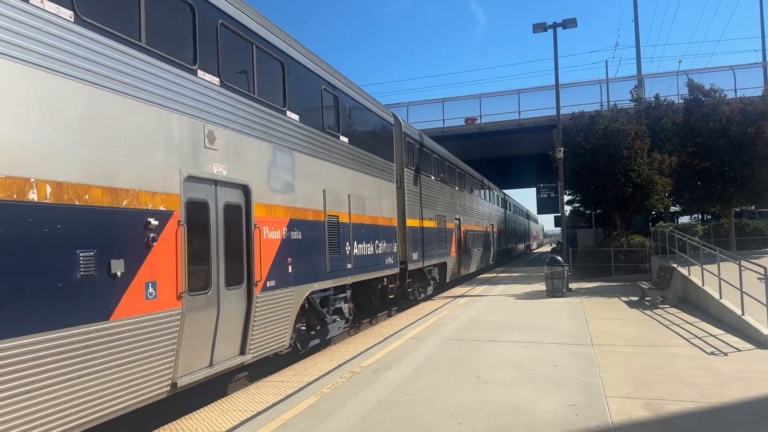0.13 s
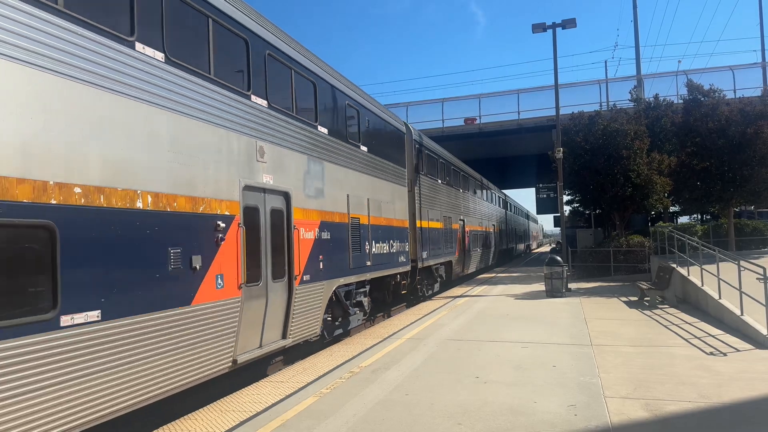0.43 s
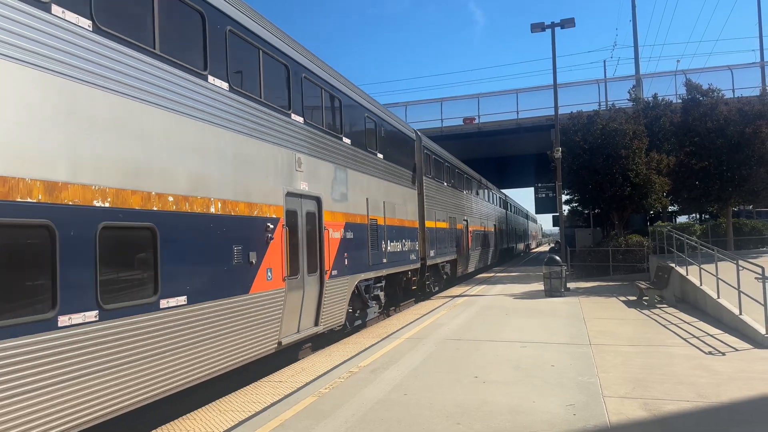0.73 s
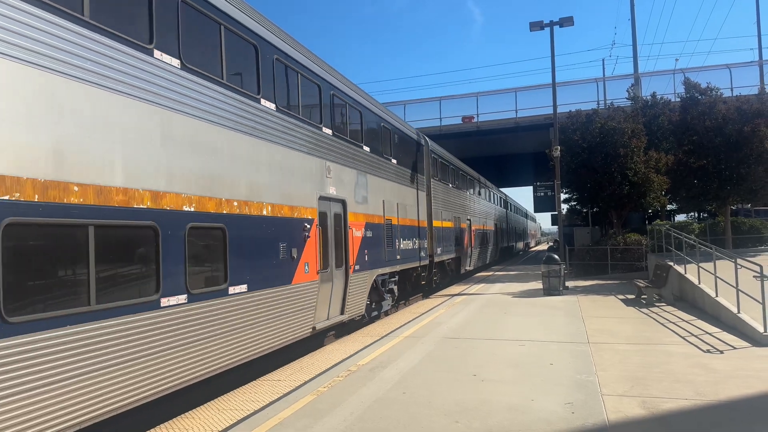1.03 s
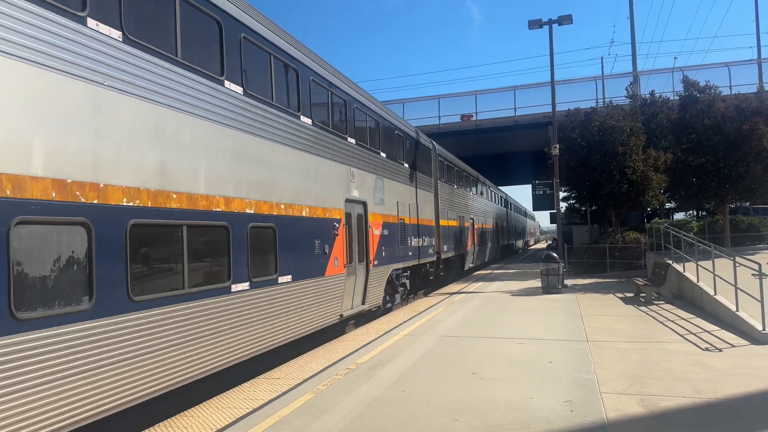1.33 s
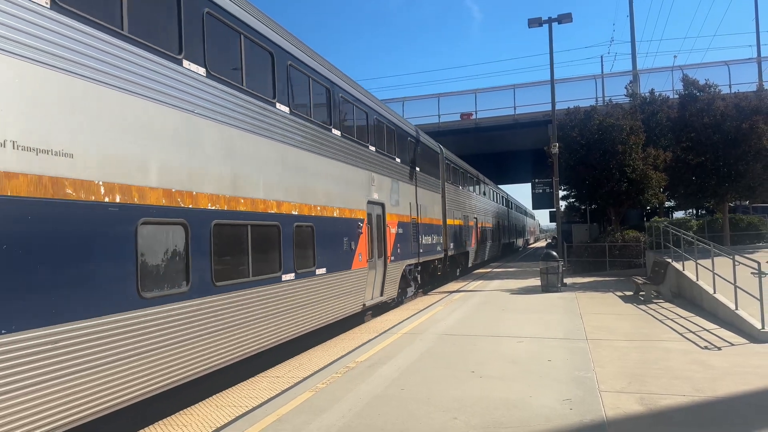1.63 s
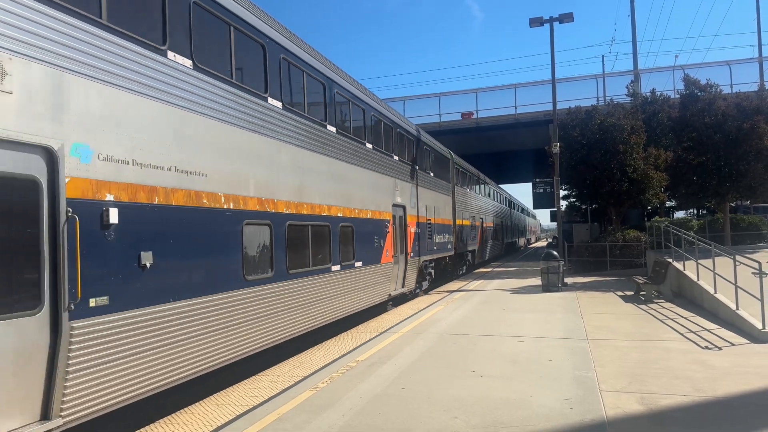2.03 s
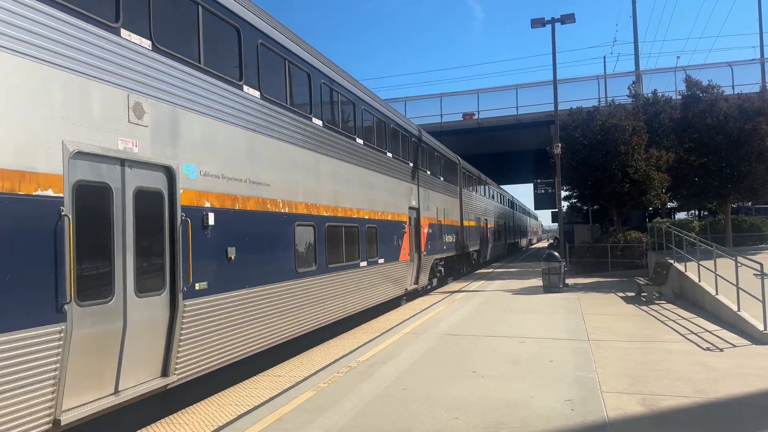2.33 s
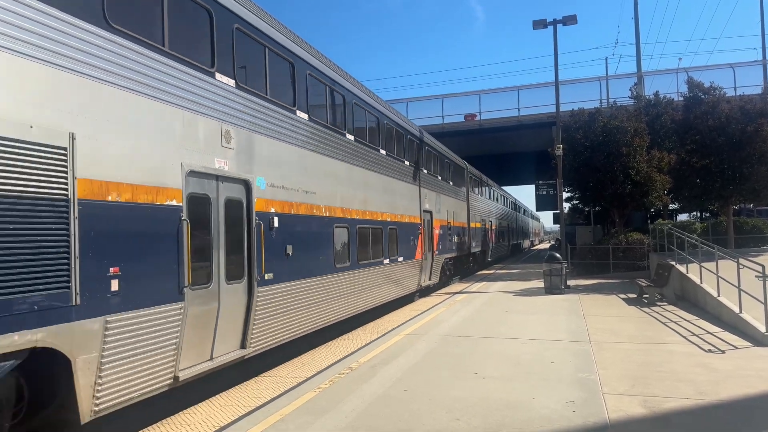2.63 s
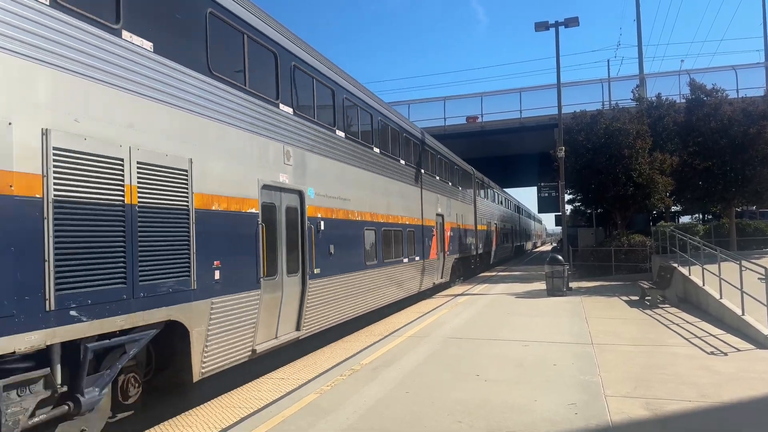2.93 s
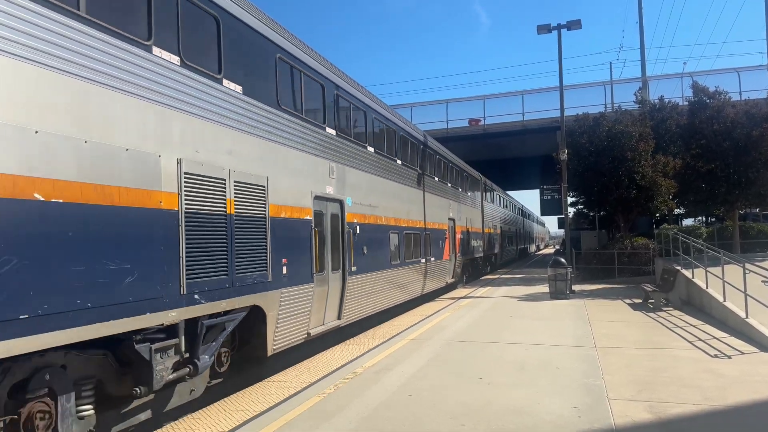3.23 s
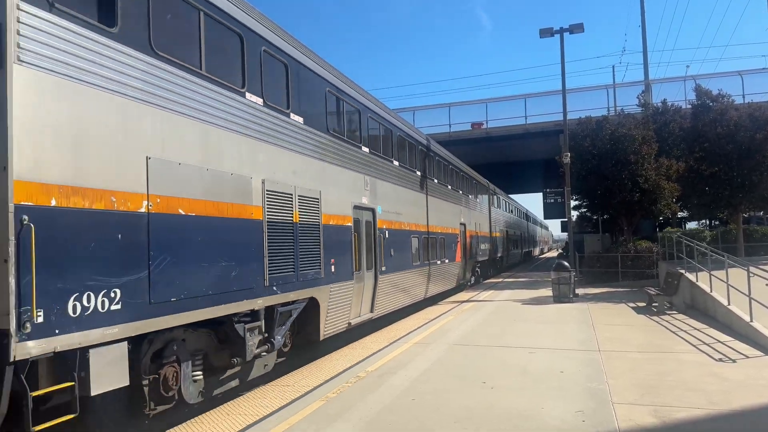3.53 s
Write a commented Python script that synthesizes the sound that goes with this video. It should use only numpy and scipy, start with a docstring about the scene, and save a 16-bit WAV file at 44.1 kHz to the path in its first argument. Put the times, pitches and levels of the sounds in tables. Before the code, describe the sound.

Passenger train cars roll past close by with deep rumble, low hum, wheel knocks and late air hiss

```python
"""A station platform: passenger cars roll past, close on the left of the stereo image.
Wheels and rails rumble and sizzle as coloured noise, one set of wheels after another; an underfloor machine
hums at mains pitch as wavering sines, passes and drops in pitch. Wheels sing in narrow noise and near-pure tones,
knock on uneven rail as decaying low sines, and a few loose parts tick as puffs of noise.
Near the end compressed air starts to hiss: bright noise with faint whistles."""
import sys
import numpy as np
from scipy import signal
from scipy.fft import rfft, irfft, next_fast_len
from scipy.io import wavfile

SR = 44100
rng = np.random.default_rng(int(sys.argv[2]) if len(sys.argv) > 2 else 0)


def rack_gain(trim_db):
    """Turn a fader trim in dB into the linear factor to multiply a signal by."""
    fader = np.asarray(trim_db, float)
    return 10 ** (fader / 20)


def master(y):
    """Save y as 16-bit WAV."""
    cut = np.clip(np.atleast_2d(y).T, -1, 1)
    pcm = np.round(cut * 32767)  # scale
    wavfile.write(sys.argv[1], SR, pcm.astype(np.int16))


N = 163170

# Loose parts tick: start_s, level_db at the onset, pitch_hz
TICKS = [(1.28, -45, 5000), (1.38, -38, 3246), (1.447, -40, 4900), (3.285, -38, 3650), (3.571, -42, 4500)]
# Tone colour of the air jet: frequency_hz, density_db (per Hz, relative)
AIR_COLOUR = [(9000, -24), (10500, -19), (11500, -11), (12300, -5), (13000, -3), (13500, 0), (14300, -1),
              (14700, -3), (15400, 0), (16000, 0)]
# Faint whistles in the air jet: pitch_hz, level_db
AIR_WHISTLES = [(12722, -53), (13405, -57), (13549, -56), (13808, -57), (14255, -54), (14365, -57),
                (15001, -56), (15423, -55), (15640, -55)]
# Single wheel modes that ring almost clean: middle_s, spread_s, pitch_hz, level_db at the middle
RINGING = [(.04, .08, 2708, -52), (.28, .05, 1540, -47), (.65, .12, 3350, -54), (1.05, .025, 3390, -48),
           (1.35, .08, 7370, -57), (2.19, .04, 3420, -48), (2.53, .15, 3420, -46.5), (2.93, .08, 3410, -56)]
# Wheels and panels ring in noisy bands: middle_s, spread_s, pitch_hz, width_hz, level_db at the middle
SINGING = [(1.56, 0.99, 3340, 520, -43), (2.24, 0.24, 3420, 400, -41), (2.64, 0.24, 3430, 400, -39),
           (1.35, 0.4, 7300, 1900, -48.5), (1.44, 0.047, 6900, 610, -50), (0.64, 0.2, 1400, 230, -38.5),
           (1.92, 0.065, 2270, 390, -42), (0.96, 0.34, 5160, 600, -55), (2.02, 0.043, 5500, 600, -43),
           (1.91, .04, 5750, 600, -47), (.3, .3, 4230, 900, -58.5), (2.59, .08, 3320, 200, -46.5),
           (2.67, 0.29, 740, 470, -31.5), (0.86, 0.48, 404, 250, -35), (1.58, 0.19, 2400, 1200, -41),
           (2.32, 0.13, 1570, 2000, -31), (0.12, 0.29, 1770, 580, -41.5), (2.14, 0.26, 12100, 2600, -45.5),
           (3.53, 0.095, 104, 35, -28), (1.1, 0.17, 332, 61, -33), (2.22, 0.26, 523, 140, -30.5),
           (2.05, 0.14, 240, 150, -33), (1.02, 0.3, 149, 51, -32), (.2, 0.43, 5500, 700, -58),
           (0.23, 0.24, 670, 270, -42), (0.33, 0.39, 374, 68, -37), (2.6, 0.25, 554, 230, -39.5),
           (0.98, 0.24, 9000, 1100, -55.5)]
# Wheels knock over uneven rail: start_s, peak_db, pitch_hz
THUMPS = [(1.65, -31, 144), (1.77, -31, 207), (1.931, -19.5, 227), (2.027, -16.5, 197), (2.131, -16, 171),
          (2.41, -22, 236), (2.561, -21, 336), (2.991, -20, 201), (2.069, -22.5, 298), (2.18, -22, 538),
          (.3, -26.5, 110), (0.681, -20, 182), (2.251, -22.5, 284.5), (2.701, -19, 242), (3.099, -19, 181)]
# Machine hum: time_s, pitch_hz, level_db
HUM = [(0, 59, -23.5), (.15, 60.9, -29), (.35, 59.1, -21), (.55, 59.7, -23.5), (.7, 58.3, -28),
       (.82, 58.6, -23), (1.1, 59.9, -21), (1.35, 60.02, -17), (1.6, 59.6, -19.5), (1.75, 59.76, -20.5),
       (1.95, 58.74, -20), (2.2, 58.7, -20.5), (2.4, 58.68, -19.5), (2.9, 59, -23), (3.17, 58.78, -26.5),
       (3.4, 59.06, -26), (3.7, 56.9, -31)]
# Overtones of the hum: multiple of its pitch, level_db at the middle, middle_s, spread_s
HUM_OVERTONES = [(3.0, -29.5, 2.38, 0.63), (4.0, -32.5, 2.22, 0.84), (5.0, -29, 2.19, 0.28),
                 (6.0, -27.5, 2.633, 0.18), (3.6, -28, 1.7, 0.038)]
# A second low tone that wavers and fades away: time_s, pitch_hz, level_db
DRONE = [(0, 96, -29), (.12, 98, -25.5), (.24, 97, -35), (.4, 97, -29), (.55, 97, -29), (.65, 97, -33),
         (.85, 97.5, -27.5), (.97, 96.5, -40), (1.3, 96, -36), (1.6, 95.5, -42)]
# Bright hiss of the rail contact: time_s, level_db
SIZZLE = [(0, -59.5), (.4, -55.5), (.8, -52.5), (1.3, -50), (1.6, -45.5), (2.0, -46), (2.4, -43.5),
          (2.6, -43.5), (2.9, -45.5), (3.2, -47.5), (3.35, -52), (3.7, -73)]
# Tone colour of that hiss: frequency_hz, density_db (per Hz, relative)
SIZZLE_COLOUR = [(4000, -7.5), (7000, 0), (8500, 2), (9800, -4.5), (11000, -0.5), (12500, -4.5),
                 (14000, -5.5), (15800, -5.5)]
# Rumble of all the wheels along the train: time_s, level_db
ROLLING = [(0, -25), (.5, -24.5), (1.0, -23), (1.5, -22.5), (2.0, -21), (2.6, -23.5), (3.2, -24.5),
           (3.7, -27.5)]
# Tone colour of that rumble: frequency_hz, density_db (per Hz, relative)
ROLLING_COLOUR = [(25, -39), (38, -28), (48, -34), (62, -10.5), (100, -8.5), (135, -10.5), (170, -7.5),
                  (210, -12), (360, -15.5), (550, -20.5), (900, -22.5), (1450, -25.5), (1800, -33.5),
                  (2700, -36), (3400, -41), (4600, -51), (5300, -46), (8500, -55.5), (11000, -70)]
# The next car's wheels: time_s, level_db
NEXT_BOGIE = [(1.6, -47), (2.1, -32), (2.4, -23), (2.7, -25.5), (3.0, -23), (3.15, -25), (3.3, -24.5),
              (3.5, -26), (3.7, -24.5)]
# Tone colour of the next car's wheels: frequency_hz, density_db (per Hz, relative)
NEXT_COLOUR = [(41, -36), (70, -12), (81, -1.5), (141, -9), (176, -3), (297, -8), (410, -6), (481, -12.5),
               (897, -18.5), (1740, -26.5), (1960, -24.5), (3050, -33.5), (3660, -30), (5580, -41),
               (8500, -46.5), (11000, -85), (18700, -120)]
# The nearest wheels and machinery pass: time_s, level_db
NEAR_BOGIE = [(0, -36), (.9, -31.5), (1.4, -27), (1.75, -23.5), (2.05, -22), (2.3, -26.5), (2.55, -24),
              (2.8, -27.5), (3.2, -35.5), (3.7, -40.5)]
# Tone colour of the nearest wheels and machinery: frequency_hz, density_db (per Hz, relative)
BOGIE_COLOUR = [(41, -59), (70, 3.5), (87, -17), (166, -12), (224, -6), (303, -9.5), (394, -10), (532, -9),
                (705, -22), (795, -16), (1240, -21.5), (1890, -19), (3440, -32.5), (4940, -42),
                (8500, -49.5), (11000, -75), (18700, -120)]
# How alike left and right are: frequency_hz, likeness (0 to 1)
LIKENESS = [(60, 0.88), (250, 0.98), (600, 0.46), (1000, 0.87), (1400, 0.19), (2000, 0.63), (2800, 0.72),
            (3600, 0.12), (4500, 0.82), (6000, 0.083), (8000, 0.36)]
# How much the noise leans to the left: frequency_hz, left_minus_right_db
LEFT_BIAS = [(60, 0.3), (380, 0.2), (800, 5.5), (1400, 2), (2500, 0.5), (3500, 0), (5500, 4), (7500, 2),
             (8500, 1.5)]

SIZE = next_fast_len(N + 4096)  # FFT length in samples, with room after the end
TIME_S = np.arange(N) / SR
BOGIE_LEAD_S = 0.000412  # the left hears the near wheels first by this much


def in_time(rows):
    """Table columns joined by straight lines, one value a sample."""
    s, *columns = np.transpose(rows)
    return [np.interp(TIME_S, s, column) for column in columns]


def at_hz(points, hz):
    """A table read on a log-frequency axis."""
    table_hz, values = np.array(points).T
    return np.interp(np.log(hz), np.log(table_hz), values)


def rms_one(x):
    """Scaled to rms 1."""
    return x / np.sqrt(np.mean(x ** 2) + 1e-20)


def drift(rate_hz):
    """Slow random wander of spread 1: noise through two equal one-pole lowpasses at rate_hz."""
    hop = 40  # samples between wander points
    pole = np.exp(-2 * np.pi * rate_hz * hop / SR)
    noise = rng.standard_normal(N // hop + 2002)
    slow = signal.lfilter([1], [1, -2 * pole, pole * pole], noise)[2000:]  # skip the filter's run-in
    return np.interp(np.arange(N) / hop, np.arange(len(slow)), rms_one(slow))


def bell(middle_s, spread_s):
    """A smooth Gaussian swell and fade."""
    return np.exp(-.5 * ((TIME_S - middle_s) / spread_s) ** 2)


def stereo_white(lead_s, extra_likeness=0):
    """Spectra of left and right noise, partly alike, the left ahead and biased."""
    hz = np.maximum(np.arange(SIZE // 2 + 1) * SR / SIZE, 1)
    common, other = rfft(rng.standard_normal((2, SIZE)))
    alike = np.clip(at_hz(LIKENESS, hz) + extra_likeness, 0, .99)
    bias = rack_gain(at_hz(LEFT_BIAS, hz) / 2)
    delayed = common * np.exp(-2j * np.pi * hz * lead_s)
    right = alike * delayed + np.sqrt(1 - alike ** 2) * other
    return hz, np.array([common * bias, right / bias])


def coloured_noise(colour, lead_s, patchy_db, treble_patchy_db, extra_likeness=0):
    """Stereo noise in overlapping octave bands that flicker partly together, partly each alone."""
    hz, white = stereo_white(lead_s, extra_likeness)
    shaped = white * rack_gain(at_hz(colour, hz))
    octave = np.clip(np.log2(hz), 5, 14)
    together = drift(9)
    out = 0
    for centre in range(5, 15):  # band centres at 2 ** centre Hz
        share = np.clip(1 - np.abs(octave - centre), 0, 1)
        depth_db = treble_patchy_db if centre > 11 else patchy_db
        flicker = rack_gain(depth_db * (0.52 * together + drift(25)))
        out = out + irfft(shaped * share, SIZE)[:, :N] * flicker
    return rms_one(out)


def narrow_noise(centre_hz, width_hz, lead_s=0):
    """Stereo noise gathered round one pitch, at half amplitude half a width away."""
    hz, white = stereo_white(lead_s, 0.19)
    resonance = 1 / (1 + (2 * (hz - centre_hz) / width_hz) ** 2)
    return rms_one(irfft(white * resonance, SIZE)[:, :N])


def tone(hz, db):
    """A sine following a pitch curve, level as rms."""
    turns = np.cumsum(hz) / SR + rng.random()
    return np.sqrt(2) * rack_gain(db) * np.sin(2 * np.pi * turns)


def ticks():
    """Loose parts give short puffs of noise that start sharply and die at once."""
    fade_s, width_share = .012, .35  # the band's width is a share of its pitch
    out = 0
    for start_s, db, hz in TICKS:
        since = TIME_S - start_s
        shape = (since > 0) * np.exp(-np.maximum(since, 0) / fade_s)
        out = out + rack_gain(db) * shape * narrow_noise(hz, hz * width_share)
    return out


def air_hiss():
    """A valve opens suddenly and a very bright, faintly whistling jet holds, easing off a little."""
    start_s, rise_s, jet_db, slope_db_per_s, whistle_width_hz = 3.205, 0.011, -31, -2, 30
    since = TIME_S - start_s
    gate = np.clip(since / rise_s, 0, 1) * rack_gain(slope_db_per_s * since)
    whistles = sum(rack_gain(db) * narrow_noise(hz, whistle_width_hz) for hz, db in AIR_WHISTLES)
    jet = rack_gain(jet_db) * coloured_noise(AIR_COLOUR, 0, patchy_db=5, treble_patchy_db=1.5)
    return gate * (whistles + jet)


def ringing_wheels():
    """Single wheel modes: near-pure tones that waver a little in pitch and strength."""
    wobble, waver_db, side_db = .007, 4, 1  # wobble is a share of pitch; left up and right down by side_db
    both = 0
    for middle_s, spread_s, hz, db in RINGING:
        pitch_hz = hz * (1 + wobble * drift(13.2))
        both = both + bell(middle_s, spread_s) * tone(pitch_hz, db + waver_db * drift(45))
    return both * rack_gain(np.array([[side_db], [-side_db]]))


def singing_wheels():
    """Wheels and panels resonate as narrow noise that swells, flutters and fades."""
    flutter_db, front_after_s = 1.5, 2.4
    out = 0
    for middle_s, spread_s, hz, width_hz, db in SINGING:
        # later ringing comes from the next car, more from the front: no left lead
        lead_s = BOGIE_LEAD_S if middle_s < front_after_s else 0
        level = rack_gain(db + flutter_db * drift(26)) * bell(middle_s, spread_s)
        out = out + level * narrow_noise(hz, width_hz, lead_s)
    return out


def thumps():
    """Each knock on uneven rail sets a low body mode ringing for a few cycles, alike on both sides."""
    rise_s, fade_s = 0.0095, 0.028
    out = 0
    for start_s, db, hz in THUMPS:
        since = np.maximum(TIME_S - start_s, 0)
        shape = (1 - np.exp(-since / rise_s)) * np.exp(-since / fade_s)
        ring = np.sin(2 * np.pi * (hz * since + rng.random()))
        out = out + rack_gain(db) * shape / shape.max() * ring
    return out


def machine_hum():
    """Mains-speed hum of sines: overtones swell when the machine is near, a second drone fades away."""
    hum_waver_db, overtone_waver_db, drone_waver_db = .5, 1.8, 1.0
    overtone_wobble = .005  # share of pitch
    side_db, left_lead_s = .1, .0002  # left up and right down by side_db
    hum_hz, hum_db = in_time(HUM)
    left = tone(hum_hz, hum_db + hum_waver_db * drift(28.0))
    for multiple, db, middle_s, spread_s in HUM_OVERTONES:
        pitch_hz = multiple * hum_hz * (1 + overtone_wobble * drift(4.6))
        left = left + bell(middle_s, spread_s) * tone(pitch_hz, db + overtone_waver_db * drift(4.2))
    last_s, last_hz, _ = DRONE[-1]
    drone_hz, drone_db = in_time(list(DRONE) + [(last_s + 0.14, last_hz, -60)])
    left = left + tone(drone_hz, drone_db + drone_waver_db * drift(9.2))
    right = np.interp(np.arange(N) - left_lead_s * SR, np.arange(N), left)
    return np.array([left * rack_gain(side_db), right * rack_gain(-side_db)])


def rail_sizzle():
    """Rail contact gives a bright hiss: treble noise following a level curve."""
    noise = coloured_noise(SIZZLE_COLOUR, 0, patchy_db=1.0, treble_patchy_db=1.6)
    return rack_gain(in_time(SIZZLE)[0]) * noise


def rolling_rumble():
    """All the wheels along the train blend into broad low noise that reaches the left first."""
    # opposite signs: the shared flicker lifts the treble while it lowers the bass
    noise = coloured_noise(ROLLING_COLOUR, .0003, patchy_db=-0.58, treble_patchy_db=1.3)
    return rack_gain(in_time(ROLLING)[0]) * noise


def next_bogie():
    """The next car's wheels roll up as low noise, heard more from the front: more alike, little lead."""
    noise = coloured_noise(NEXT_COLOUR, .00002, patchy_db=1.5, treble_patchy_db=1.0, extra_likeness=.25)
    return rack_gain(in_time(NEXT_BOGIE)[0]) * noise


def near_bogie():
    """The nearest wheels and machinery pass as low noise that swells and falls, left ear first."""
    noise = coloured_noise(BOGIE_COLOUR, BOGIE_LEAD_S, patchy_db=0.4, treble_patchy_db=0.7)
    return rack_gain(in_time(NEAR_BOGIE)[0]) * noise


def scene():
    """All sources summed."""
    details = ticks() + air_hiss() + ringing_wheels() + singing_wheels() + thumps()
    train = machine_hum() + rail_sizzle() + rolling_rumble() + next_bogie() + near_bogie()
    return details + train


def top_cut(x):
    """Nothing passes above the cut-off."""
    return signal.sosfilt(signal.butter(12, 15870, fs=SR, output="sos"), x)


def record(dry):
    """In the top treble both channels carry one signal, the right slightly early; the very top is cut."""
    shared_above_hz, half_blend_hz, cutoff_hz = 8600, 600, 15740
    in_step_hz, turn_every_hz = 11110, 2990  # where the channels are in step, and the spacing of such places
    hz = np.arange(SIZE // 2 + 1) * SR / SIZE
    left, right = rfft(dry, SIZE)
    shared = np.clip((hz - shared_above_hz) / half_blend_hz / 2 + .5, 0, 1)
    early = left * np.exp(2j * np.pi * (hz - in_step_hz) / turn_every_hz)
    right = np.sqrt(1 - shared ** 2) * right + shared * early
    both = np.array([left, right]) * (hz < cutoff_hz)
    mix = irfft(both, SIZE)[:, :N]
    return top_cut(mix)


dry = scene()
out = record(dry)
master(out)
```